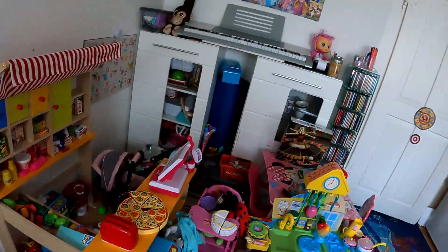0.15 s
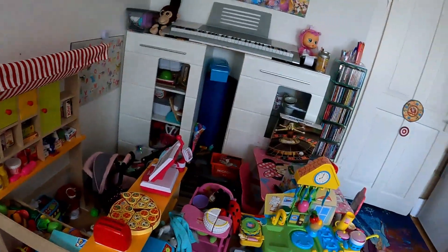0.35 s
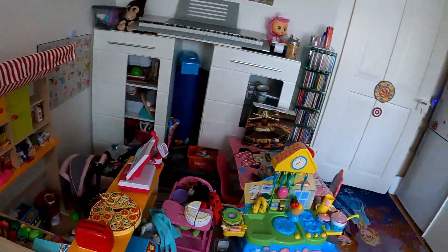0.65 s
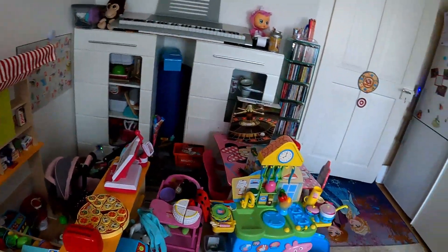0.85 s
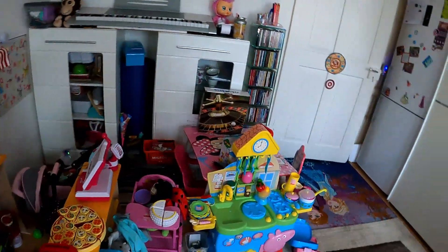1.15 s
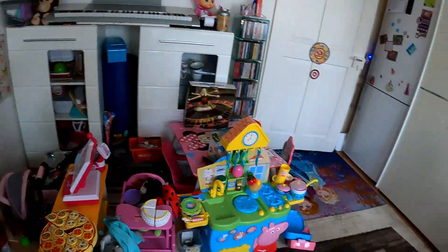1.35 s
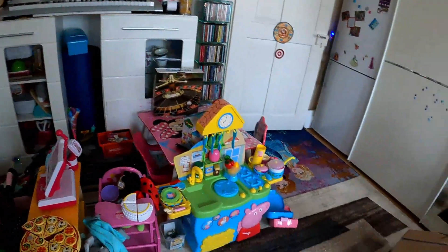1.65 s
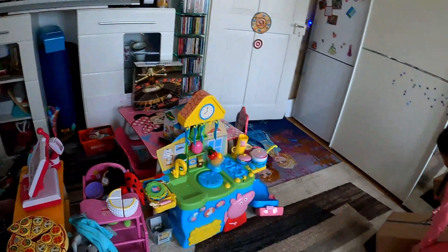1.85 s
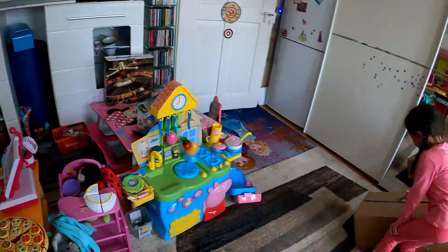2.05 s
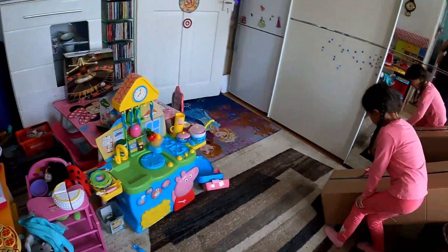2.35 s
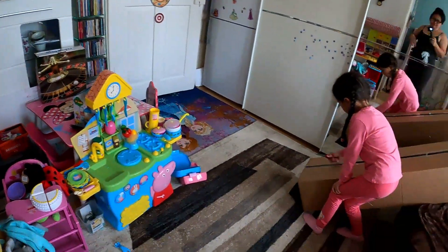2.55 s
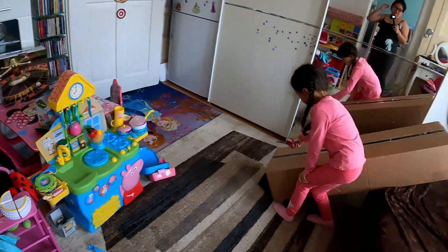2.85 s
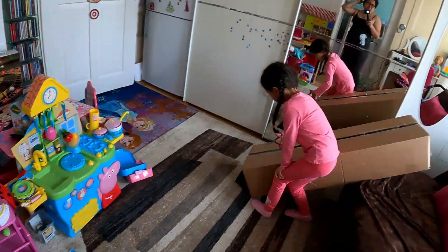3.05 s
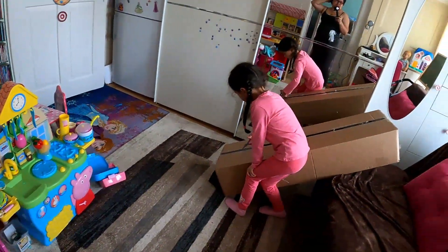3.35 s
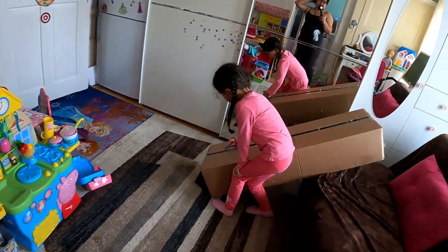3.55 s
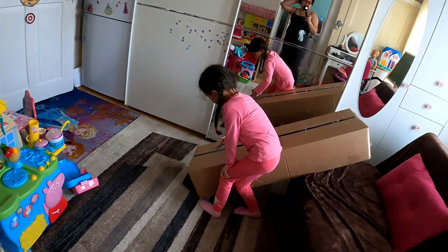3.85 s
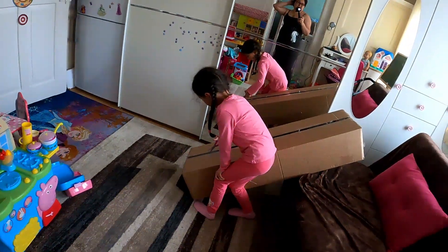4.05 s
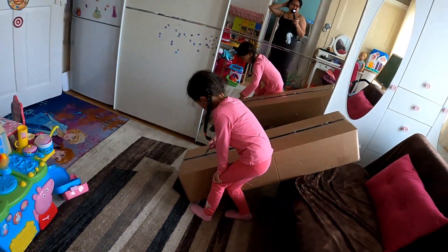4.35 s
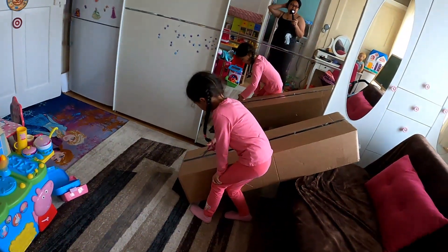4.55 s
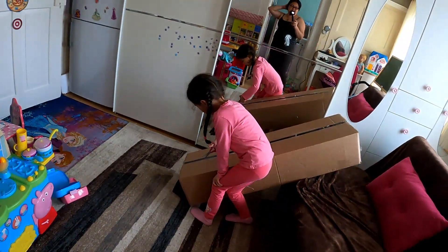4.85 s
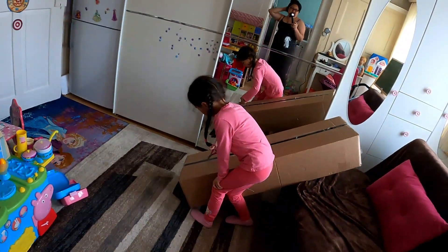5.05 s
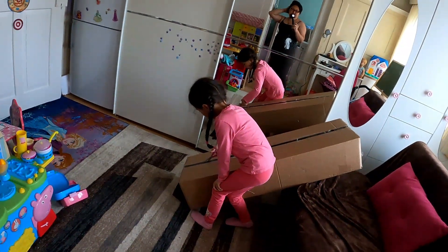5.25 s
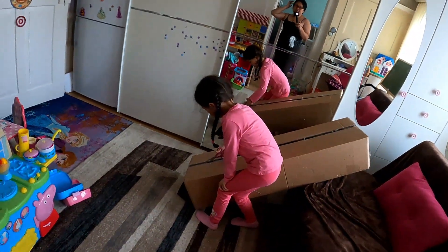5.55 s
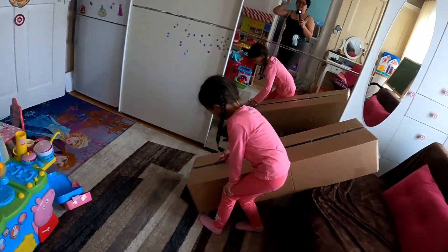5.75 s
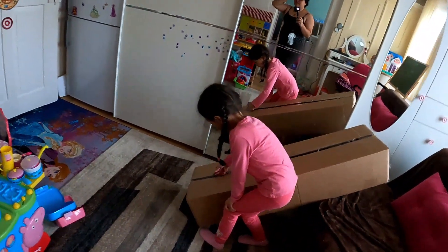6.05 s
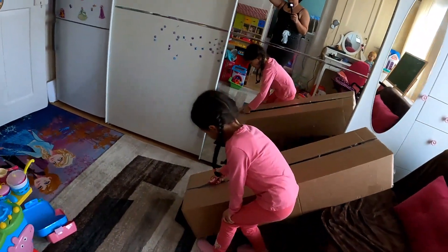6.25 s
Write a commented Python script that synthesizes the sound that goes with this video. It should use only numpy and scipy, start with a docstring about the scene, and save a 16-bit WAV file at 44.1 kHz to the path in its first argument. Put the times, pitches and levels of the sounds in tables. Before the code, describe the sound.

Cardboard scrapes, rustles and knocks as a big hollow box is heaved about indoors, with one loud thump and lighter handling later.

```python
"""A small furnished room: a long empty cardboard box is shoved, tipped and handled on the floor.
Rubbing fibres catch and let go; flaps and edges knock and snap. Both drive the box's panels,
big faces and gritty paper skin, and a few scuffs sing in narrow bands. Each heave makes the
hollow body boom and the floorboards shudder. A faint low rumble of the house lies below."""
import sys
import numpy as np
from scipy import signal
from scipy.fft import rfft, irfft, next_fast_len
from scipy.io import wavfile

SR = 44100
rng = np.random.default_rng(int(sys.argv[2]) if len(sys.argv) > 2 else 0)


def log_audio(samples):
    """Write samples as a 16-bit WAV file to the path given in sys.argv[1]."""
    # one column per channel
    frames = np.atleast_2d(samples).T
    # limit to full scale, then quantise
    limited = np.clip(frames, -1, 1)
    pcm = np.round(limited * 32767).astype(np.int16)
    wavfile.write(sys.argv[1], SR, pcm)


N = 282240

# knocks and snaps: (time [s], panel level [dB], crack level [dB], panel pitch [Hz], crack centre [Hz])
KNOCKS = [(0.053, -26.5, -39, 1700, 3620), (0.131, -54, -49, 1600, 2600), (0.186, -31, -39.5, 1630, 2280),
          (0.314, -18.5, -37, 895, 3010), (0.403, -51, -36.5, 1330, 8100),
          (0.488, -24.5, -36.5, 1190, 2330), (0.499, -24.5, -44, 1210, 2500),
          (0.549, -28.5, -37, 975, 4340), (0.562, -32, -42, 1100, 4800), (0.687, -58, -45, 1170, 6000),
          (0.731, -36, -40, 2050, 2980), (0.745, -47, -40.5, 1500, 7200), (0.789, -31.5, -38.5, 1140, 5070),
          (0.901, -41, -44.5, 1580, 2230), (1.019, -57, -56.5, 1780, 4900), (1.089, -58, -50, 544, 3940),
          (1.108, -48, -51, 1500, 4000), (1.158, -26.5, -37, 910, 3950), (1.266, -41, -55, 1500, 3000),
          (1.28, -16.5, -29, 1300, 3020), (1.289, -13, -19.5, 1430, 3130), (1.556, -32.5, -51, 960, 2490),
          (1.591, -36, -41.5, 872, 4560), (1.631, -18, -31.5, 1610, 2750), (1.789, -40, -50, 1300, 6150),
          (1.93, -30.5, -47, 1830, 2320), (1.963, -25.5, -35, 1400, 2560), (2.068, -58, -50.5, 1200, 4100),
          (2.146, -45, -49, 1080, 6180), (2.178, -28.5, -35, 1110, 2520), (2.248, -28.5, -41.5, 1940, 2410),
          (2.314, -46, -50, 1200, 4000), (2.365, -32.5, -40, 910, 2230), (2.453, -36, -51, 991, 2590),
          (2.48, -47, -44, 900, 3500), (2.495, -41, -36.5, 654, 2410), (2.551, -24.5, -39, 730, 3780),
          (2.6, -24, -38, 1000, 3450), (2.617, -27.5, -39, 945, 3060), (2.861, -56, -71, 706, 5500),
          (3.106, -52, -54, 1295, 5220), (3.154, -41, -54, 620, 3890), (3.19, -50, -45, 1000, 3400),
          (3.201, -43, -43, 1080, 3340), (3.241, -56, -51.5, 1100, 3380), (3.336, -31.5, -43, 655, 3180),
          (3.506, -26, -41.5, 610, 2770), (3.662, -55, -51, 1390, 8100), (3.698, -48, -53, 2080, 5840),
          (3.72, -47, -45, 1290, 4000), (3.833, -45.5, -53.5, 1280, 3300), (3.92, -49, -59, 985, 4100),
          (3.94, -38.5, -43, 1850, 2250), (4.205, -50, -61, 1610, 3610), (4.24, -29, -40, 1030, 4280),
          (4.526, -25.5, -41.5, 597, 3550), (4.816, -51, -60.5, 1300, 2220),
          (4.963, -37.5, -52, 1060, 4340), (5.143, -35.5, -43.5, 1910, 5000), (5.21, -33.5, -42, 720, 4100),
          (5.33, -46, -58.5, 1280, 2320), (5.465, -49, -58.5, 1310, 2690), (5.656, -42.5, -57, 1110, 2370),
          (5.673, -41, -46.5, 1350, 4200), (5.749, -44, -48.5, 1400, 4070), (5.767, -48, -55, 969, 3760),
          (5.848, -57, -53, 1240, 2530), (5.876, -41, -47.5, 1280, 2830), (5.906, -36, -45.5, 720, 5070),
          (5.959, -46, -60, 674, 6300), (5.998, -46, -42.5, 1040, 4830), (6.108, -42, -55, 1300, 4000),
          (6.145, -27.5, -34, 1920, 2330), (6.211, -26.5, -36.5, 1960, 3670), (6.266, -56, -49, 1300, 8000),
          (6.339, -25.5, -39.5, 1580, 2530), (6.361, -29.5, -33, 1660, 2200), (6.368, -26, -33, 1030, 4130)]
# rubbing strokes: (peak time [s], swell [ms per 20 dB], fade [ms per 20 dB], panel level [dB],
# grit level [dB], face level [dB], panel pitch [Hz])
STROKES = [(0.0, 50, 246, -44, -68, -48.5, 730), (0.1, 102, 300, -45.5, -57.5, -48.5, 1150),
           (0.2, 43, 247, -36.5, -46.5, -48, 1360), (0.28, 33, 200, -30.5, -46, -48, 1010),
           (0.336, 72, 71, -20.5, -37, -37.5, 1040), (0.39, 50.5, 146, -52, -53.5, -46, 1100),
           (0.509, 133, 92, -30.5, -40.5, -52, 1300), (0.57, 82, 210, -35, -52, -44.5, 1110),
           (0.679, 154, 118, -47, -48, -41.5, 1000), (0.813, 52, 131, -43, -52, -42, 1200),
           (0.93, 200, 92, -49, -63, -72, 1180), (1.19, 101.5, 117, -35.5, -44.5, -38, 1130),
           (1.288, 17.5, 82, -25.5, -31.5, -26, 1020), (1.38, 62, 183, -56, -53, -59, 1180),
           (1.57, 40, 56, -44, -57.5, -40, 960), (1.642, 58, 186, -32.5, -44, -39.5, 1340),
           (1.691, 98, 92, -32.5, -48.5, -42, 1140), (1.808, 57, 56, -46, -65, -33.5, 1140),
           (1.972, 55, 108, -37, -49.5, -38, 1010), (2.16, 37, 97, -47, -54.5, -51, 1280),
           (2.3, 250, 108, -42, -63, -49, 1160), (2.45, 132, 266, -43, -50, -68, 1100),
           (2.549, 169, 148, -32.5, -48.5, -38, 740), (2.622, 120, 72.5, -27.5, -36.5, -33, 1130),
           (2.949, 111, 76, -57, -71.5, -72, 950), (3.208, 71, 115, -41, -51.5, -50.5, 1190),
           (3.36, 43, 185, -42, -52, -45.5, 830), (3.518, 0, 89, -43, -53.5, -54, 1070),
           (3.73, 105, 208, -52, -57, -60, 1740), (3.949, 38, 150, -47.5, -60, -58, 1820),
           (4.25, 37, 148, -42.5, -53, -61, 980), (4.3, 70, 136, -58, -60, -58, 1110),
           (4.462, 293, 202, -51, -59, -55, 770), (4.537, 36, 48, -38, -52, -43, 700),
           (4.835, 30, 200, -61, -75, -79, 1600), (4.925, 20, 142.5, -55, -83, -64, 750),
           (4.979, 73, 113, -50.5, -66, -54, 1000), (5.09, 92, 100, -73, -82.5, -69, 1400),
           (5.155, 38, 93, -51, -53, -50.5, 1250), (5.22, 140, 116, -44.5, -55, -48.5, 1050),
           (5.6, 441, 200, -56, -67, -59, 1310), (5.68, 91, 100, -47.5, -57.5, -75, 1280),
           (5.76, 24, 118, -56, -57, -46, 900), (5.79, 125, 350, -48.5, -55.5, -62, 1170),
           (5.92, 198, 152, -47.5, -60.5, -47.5, 950), (6.01, 57, 100, -54, -71, -49.5, 940),
           (6.085, 58, 204, -41, -65, -45.5, 1080), (6.13, 94, 100, -37, -49.5, -44.5, 1290),
           (6.162, 2, 130, -33, -46.5, -45.5, 1730), (6.28, 198, 65, -45.5, -55, -50, 1170),
           (6.385, 50, 300, -31.5, -41, -31, 1500)]
# heaves of the whole box: (time [s], hold [ms], boom level [dB], shudder level [dB])
HEAVES = [(0.14, 40, -69, -68), (0.33, 67, -36.5, -65), (0.45, 20, -57, -72), (0.55, 58, -40.5, -68),
          (0.67, 40, -50.5, -70), (0.83, 15, -48.5, -66), (1.205, 10, -41, -68), (1.297, 13, -27, -43),
          (1.36, 17, -40.5, -55), (1.44, 6.5, -58, -49), (1.61, 10, -51, -63), (1.68, 12, -43, -57),
          (1.8, 53, -45.5, -56), (1.985, 10, -41.5, -68), (2.1, 10, -57, -70), (2.2, 30, -48.5, -65),
          (2.345, 8.7, -55, -73), (2.55, 44, -44, -57), (2.63, 29, -39.5, -60), (2.72, 19, -63, -87),
          (4.26, 17, -68, -79), (4.55, 20, -72, -77), (5.16, 18, -63.5, -74), (5.99, 10, -63.5, -65),
          (6.08, 20, -64, -64), (6.17, 10, -58, -80), (6.222, 10, -47.5, -74), (6.372, 18, -36.5, -69)]


def from_db(db):
    """Decibels to gain."""
    return 10 ** (np.asarray(db) / 20)


def rms_one(x):
    """Scale to unit rms."""
    return x / np.sqrt(np.mean(x ** 2) + 1e-20)


def at_hz(points, hz):
    """Read a table on a log-frequency axis."""
    points_hz, values = np.transpose(points)
    return np.interp(np.log(np.maximum(hz, 1)), np.log(points_hz), values)


def coloured(x, spectrum):
    """Shape by a spectrum; unit power gain for white noise."""
    gain = rms_one(from_db(at_hz(spectrum, np.fft.rfftfreq(N, 1 / SR))))
    return irfft(rfft(x) * gain, N)


def low_cut(x, hz, order):
    """High-pass filter."""
    return signal.sosfilt(signal.butter(order, hz, "high", fs=SR, output="sos"), x)


def resonate(drive, modes):
    """Parallel resonances of alternating sign, each fed drive(hz); power normalised."""
    out = 0
    for k, (hz, width_hz, db) in enumerate(modes):
        r = np.exp(-np.pi * width_hz / SR)
        poles = [1, -2 * r * np.cos(2 * np.pi * hz / SR), r * r]
        ring = signal.lfilter([1 - r, 0, r - 1], poles, drive(hz) + 1e-18)
        out = out + (-1) ** k * from_db(db) * ring
    power = sum(from_db(2 * db) * 2 * np.pi * width_hz / SR for _, width_hz, db in modes)
    return out / np.sqrt(power)


def steadied(x):
    """Even out most of a ringing note's level swings; unit rms."""
    x = rms_one(x)
    return rms_one(x / (np.abs(signal.hilbert(x)) + .3))


def flicker(per_s, depth_db):
    """Randomly wandering gain, up to 40 steps a second."""
    steps = from_db(depth_db * rng.standard_normal(int(N / SR * 40 + 2)))
    return np.interp(np.arange(N) / SR * per_s, np.arange(len(steps)), steps)


def swells(peak_s, swell_ms, fade_ms, hold_ms=0):
    """Power per ms, one row per event: rise, hold, fall; slopes in ms per 20 dB."""
    ms = np.arange(N * 1000 // SR + 1) - 1000 * np.reshape(peak_s, (-1, 1))
    up, down, hold = (np.maximum(np.reshape(v, (-1, 1)), 1) for v in (swell_ms, fade_ms, hold_ms))
    drop_db = 20 * np.clip(np.maximum(-ms / up, (ms - hold) / down), 0, 6)
    return from_db(-2 * drop_db)


def per_sample(per_ms):
    """Stretch a per-ms curve to samples."""
    return np.interp(np.arange(N) * 1000 / SR, np.arange(len(per_ms)), per_ms)


def summed(db, shapes, rest_db=-120):
    """Gain of overlapping swells, added in power."""
    return per_sample(np.sqrt(from_db(2 * db) @ shapes + from_db(2 * rest_db)))


def held(times_s, values):
    """Hold each value until the next event."""
    latest = np.searchsorted(np.round(times_s * SR), np.arange(N), "right") - 1
    return values[np.maximum(latest, 0)]


def near(hz, centre_hz, db_per_octave, max_cut_db):
    """The spot touched favours one pitch; gain falls away from it."""
    octaves = np.abs(np.log2(hz / centre_hz))
    return from_db(-np.minimum(db_per_octave * octaves, max_cut_db))


def grains(per_s, spread_db, brush_db):
    """Fibres catch and let go: uneven random clicks over a smooth brush."""
    sizes = from_db(spread_db * np.minimum(rng.exponential(1, N), 3)) * rng.choice([-1, 1], N)
    clicks = rms_one(sizes * (rng.random(N) < per_s / SR))
    return rms_one(clicks + from_db(brush_db) * rng.standard_normal(N))


def contacts(times_s, levels_db, decay_ms, snap_db):
    """Force of the knocks: a sharp snap, then dying crackle."""
    push, snap = np.zeros((2, N))
    t = np.arange(SR // 5) / SR
    dying = np.exp(-t * 1000 / decay_ms)
    for s, db in zip(times_s, levels_db):
        at = round(s * SR)
        span = slice(at, at + len(t))
        push[span] = np.hypot(push[span], from_db(db) * dying[:N - at])
        snap[at] = from_db(db + snap_db)
    return push * grains(per_s=2500, spread_db=2, brush_db=-0.5) + snap


def house_rumble():
    """Low, slowly wavering rumble of the house; stereo."""
    # rumble spectrum: (frequency [Hz], relative level [dB])
    spectrum = [(15, -65.5), (25, -12), (90, -15), (191, 9.5), (394, 4), (811, -18), (1280, -5.5),
                (3090, -28), (3350, -24.5), (6900, -18.5), (12100, -31.5), (15000, -41)]
    mid, side = coloured(rng.standard_normal((2, N)), spectrum)
    stereo = mid + from_db(-3.5) * side * [[1], [-1]]
    return from_db(-65.5) * flicker(per_s=5, depth_db=2.5) * stereo


def room(x, wet_db, side_db, spots=6):
    """Dense echoes that change as the contact moves; a second set makes the ears differ."""
    # reverberation: (frequency [Hz], 60 dB decay time [s])
    t60 = [(60, 0.43), (400, 0.1), (2000, 0.19), (12000, 0.12)]
    # stereo width: (frequency [Hz], relative side level [dB])
    width = [(60, -12.5), (110, -12.5), (200, -25.5), (380, -9), (700, -3), (1280, -4.5), (2370, 0),
             (4370, -3), (8070, -4), (14900, -5.5)]
    t = np.arange(SR // 2) / SR
    echoes = np.zeros((2, spots, len(t)))
    for low_hz in 40 * 2. ** np.arange(9):
        band = signal.butter(2, [low_hz, min(2 * low_hz, 20000)], "band", fs=SR, output="sos")
        decay = from_db(-60 * t / at_hz(t60, 1.86 * low_hz)) * (t > .002)
        tails = rng.standard_normal(echoes.shape) * decay / np.sqrt(np.sum(decay ** 2))
        echoes += signal.sosfilt(band, tails)
    size = next_fast_len(N + len(t))
    place = np.arange(N) / SR / .08 % spots   # next spot every 80 ms
    away = np.abs(place - np.arange(spots)[:, None])
    crossfade = np.sqrt(np.clip(1 - np.minimum(away, spots - away), 0, 1))
    wet, apart = np.sum(rfft(x * crossfade, size) * rfft(echoes, size), axis=1)
    mid = rfft(x, size) + from_db(wet_db) * wet
    side = apart * from_db(side_db + at_hz(width, np.fft.rfftfreq(size, 1 / SR)))
    return irfft(np.stack([mid + side, mid - side]), size)[:, :N]


def floor_shudder(lag_s=.022):
    """The floorboards answer each heave late, with one slow mode."""
    push = rng.standard_normal(N)
    shake = resonate(lambda hz: push, [(37.4, 27, 0)])
    narrowed = resonate(lambda hz: shake, [(33.4, 22, 0)])
    time_s, hold_ms, _, shudder_db = np.transpose(HEAVES)
    shapes = swells(time_s + lag_s, swell_ms=66, fade_ms=90, hold_ms=hold_ms)
    return summed(shudder_db, shapes, rest_db=-85) * steadied(narrowed)


def scuffs():
    """Brief scuffs, each swelling and fading in one narrow band."""
    # (time [s], peak level [dB], centre [Hz], bandwidth [Hz], length [ms])
    events = [(0.564, -39.5, 4600, 800, 36), (1.8, -56, 6250, 300, 23), (2.53, -40.5, 746, 150, 69),
              (2.95, -71, 994, 119, 75), (3.96, -50, 1830, 219, 31), (4.329, -46.5, 955, 350, 28),
              (5.09, -73, 5080, 700, 120), (5.788, -49, 4120, 604, 29)]
    t, noise = np.arange(N) / SR, rng.standard_normal(N)
    out = np.zeros(N)
    for time_s, db, centre_hz, width_hz, length_ms in events:
        envelope = from_db(db) * np.exp(-(2000 * (t - time_s) / length_ms) ** 2)
        out += envelope * resonate(lambda hz: noise, [(centre_hz, width_hz, 0)])
    return out


def hollow_boom(friction):
    """The hollow body booms on each heave; the floor damps it once the push ends."""
    # cavity modes: (frequency [Hz], bandwidth [Hz], relative level [dB])
    modes = [(109.1, 12.5, 8), (136, 48, -10)]
    time_s, hold_ms, boom_db, _ = np.transpose(HEAVES)
    shapes = swells(time_s, swell_ms=30, fade_ms=40, hold_ms=hold_ms)
    ring = steadied(resonate(lambda hz: friction, modes))
    return low_cut(summed(boom_db, shapes, rest_db=-88.5) * ring, hz=75, order=2)


def big_faces(friction, strokes):
    """Rubbing and knocks stir the low modes of the big faces."""
    # face modes: (frequency [Hz], bandwidth [Hz], relative level [dB])
    modes = [(144, 27, -5.5), (188.8, 33.3, 0), (231, 40, -1.5), (280.6, 48, -3), (316.7, 46, -4.5),
             (369, 30.6, -2), (437, 37, -10.5)]
    *_, face_db, _ = np.transpose(STROKES)
    rub = summed(face_db, strokes) * friction
    time_s, hit_db, _, struck_hz, _ = np.transpose(KNOCKS)
    thud_db = hit_db - 13.5 - 0.5 * np.log2(struck_hz / 1000)   # high knocks stir them least
    thud = contacts(time_s, thud_db, decay_ms=9, snap_db=24)
    return resonate(lambda hz: rub * flicker(per_s=8.4, depth_db=1) + thud, modes)


def paper_skin(friction, strokes, grit_hz=3500):
    """The rough skin rustles when rubbed and cracks when knocked, in half-octave bands."""
    # grit spectrum: (frequency [Hz], relative level [dB])
    spectrum = [(1060, -30), (1800, -0.5), (3180, -8.5), (3350, -7.5), (5650, -7.5), (6230, -9.5),
                (6870, -9), (8060, -12.5), (11900, -18), (15000, -36)]
    *_, grit_db, _, _ = np.transpose(STROKES)
    creases = grains(per_s=60, spread_db=3, brush_db=-40)   # small folds popping
    rub = summed(grit_db, strokes) * (friction + from_db(-4) * creases)
    time_s, _, crack_db, _, centres_hz = np.transpose(KNOCKS)
    crack = contacts(time_s, crack_db, decay_ms=9.3, snap_db=11.5)
    crack_hz = held(time_s, centres_hz)
    edges_hz = 1300 * 2 ** np.arange(0, 4.5, .5)
    out = np.zeros(N)
    for k, (low_hz, high_hz) in enumerate(zip(edges_hz, edges_hz[1:])):
        hz = np.sqrt(low_hz * high_hz)
        rubbed = rub * near(hz, grit_hz, db_per_octave=7.1, max_cut_db=6.4)
        cracked = crack * near(hz, crack_hz, db_per_octave=6.4, max_cut_db=9)
        drive = rubbed * flicker(per_s=36, depth_db=0.75) + cracked
        band = signal.butter(2, [low_hz, high_hz], "band", fs=SR, output="sos")
        out += (-1) ** k * signal.sosfilt(band, drive)   # alternating signs join the bands evenly
    return coloured(out, spectrum)


def panels(friction, strokes):
    """Rubbing and knocks ring the panels, most near the pitch each contact favours."""
    # panel modes: (frequency [Hz], bandwidth [Hz], relative level [dB])
    modes = [(501, 117, -3), (657, 55, 0.5), (737, 63, -0.5), (859, 121, -1), (935, 123, 1), (1076, 89, 0),
             (1167, 100, -1), (1235, 76, 0), (1313.4, 60, -1), (1473, 290, -2), (1670, 140, -4.5),
             (1827, 22, -5.5), (2006, 110, -3.5), (2060, 22, -8)]
    *_, panel_db, _, _, stirred_hz = np.transpose(STROKES)
    rub = summed(panel_db, strokes) * friction
    power = from_db(2 * panel_db)
    rub_hz = per_sample(power * stirred_hz @ strokes / (power @ strokes))   # loudest stroke dominates
    time_s, hit_db, _, struck_hz, _ = np.transpose(KNOCKS)
    hit = contacts(time_s, hit_db, decay_ms=8.5, snap_db=15)
    hit_hz = held(time_s, struck_hz)

    def drive(hz):
        rubbed = rub * near(hz, rub_hz, db_per_octave=6.7, max_cut_db=5.8)
        struck = hit * near(hz, hit_hz, db_per_octave=11, max_cut_db=5.4)
        return rubbed * flicker(per_s=11, depth_db=2.3) + struck

    return resonate(drive, modes)


def cardboard(friction):
    """Panels, skin and faces under the same strokes."""
    peak_s, swell_ms, fade_ms, *_ = np.transpose(STROKES)
    strokes = swells(peak_s, swell_ms, fade_ms)
    ring = panels(friction, strokes)
    grit = paper_skin(friction, strokes)
    thud = big_faces(friction, strokes)
    return low_cut(ring + thud, hz=130, order=3) + grit   # too small to radiate deep bass


def scene():
    """The box in the room, drifting left; its deep notes nearly alike in both ears."""
    # box position: (time [s], left minus right [dB])
    drift = [(0.0, 0), (1.96, 0.3), (3.62, 1.5), (6.4, 1.0)]
    balance_db = np.interp(np.arange(N) / SR, *np.transpose(drift))
    pan = from_db(balance_db / 2 * [[1], [-1]])
    friction = grains(per_s=1200, spread_db=4, brush_db=-4.5)
    box = cardboard(friction)
    deep = hollow_boom(friction) + floor_shudder()
    wall_echo = np.roll(deep, SR // 100) * from_db(-27.5) * [[1], [-1]]   # 10 ms late
    return room(box + scuffs(), wet_db=-4, side_db=-4) * pan + deep + wall_echo + house_rumble()


def record(dry):
    """Slight left-channel delay, then a steep treble cut."""
    delay_samples, stopband_hz = .55, 15600
    delay = np.exp(-2j * np.pi * np.fft.rfftfreq(N) * delay_samples)
    left = irfft(rfft(dry[0]) * delay, N)
    top_cut = signal.cheby2(12, 70, stopband_hz, fs=SR, output="sos")
    return signal.sosfilt(top_cut, np.stack([left, dry[1]]))


dry = scene()
out = record(dry)
log_audio(out)
```